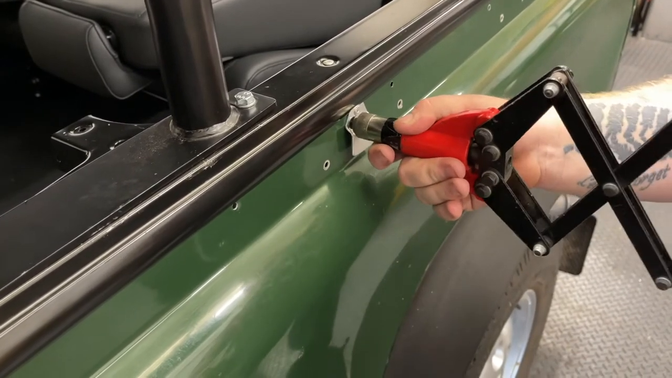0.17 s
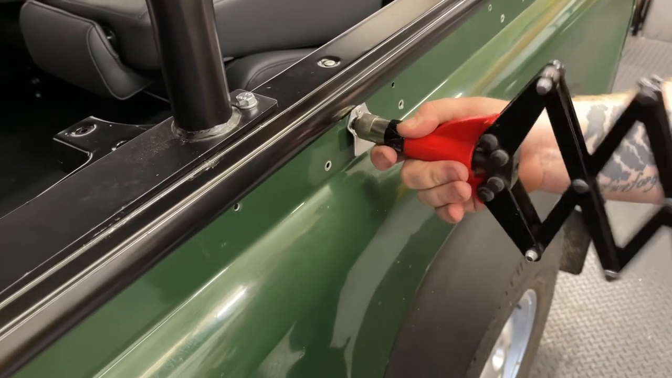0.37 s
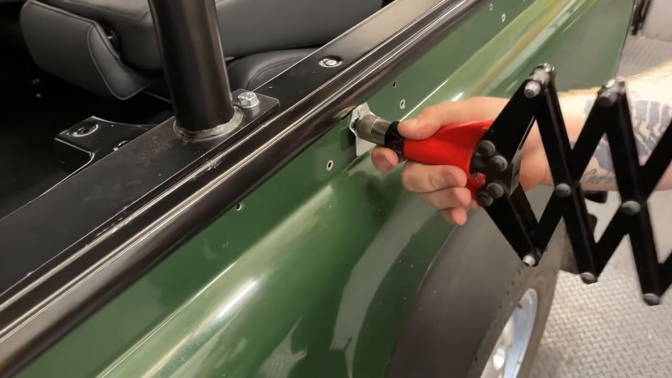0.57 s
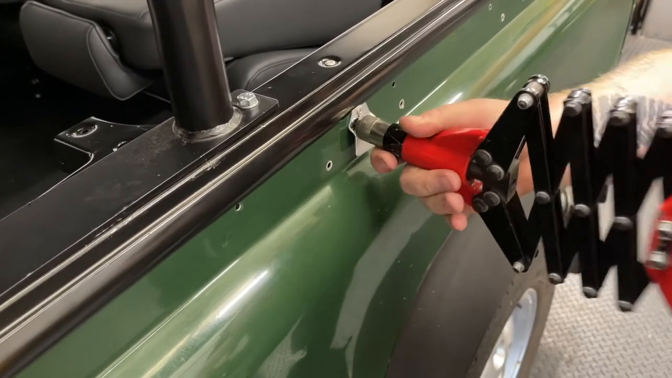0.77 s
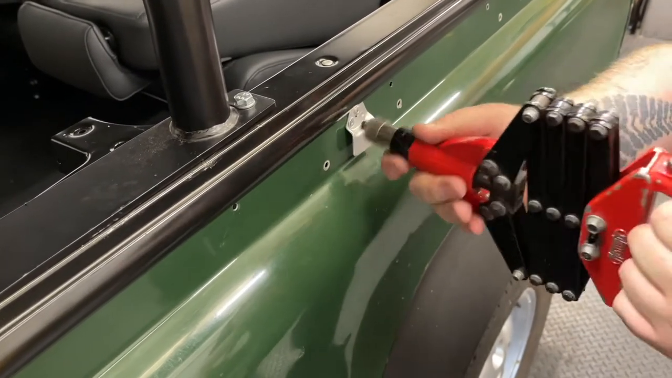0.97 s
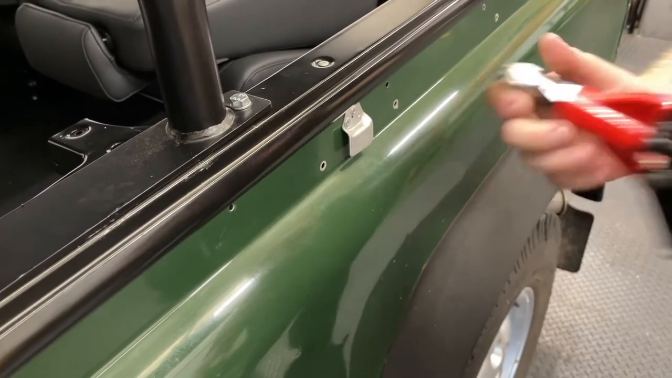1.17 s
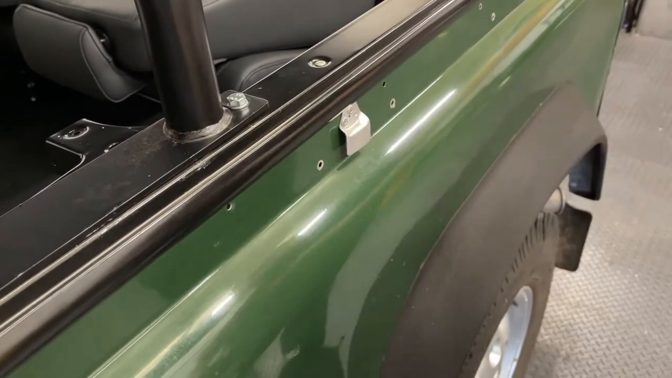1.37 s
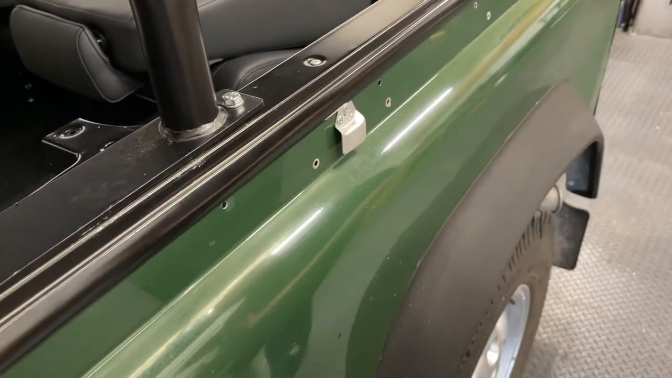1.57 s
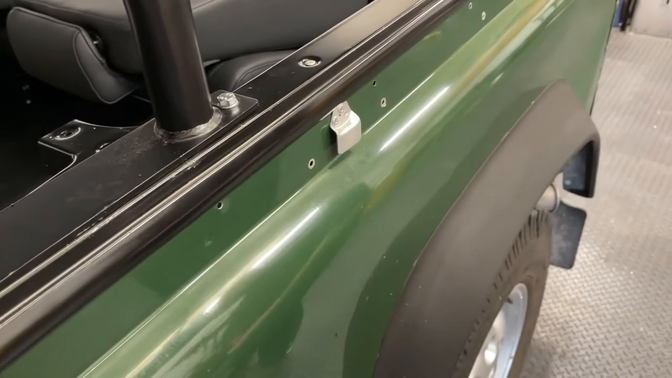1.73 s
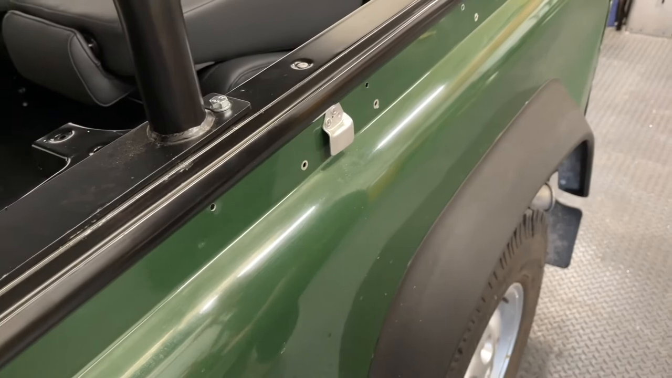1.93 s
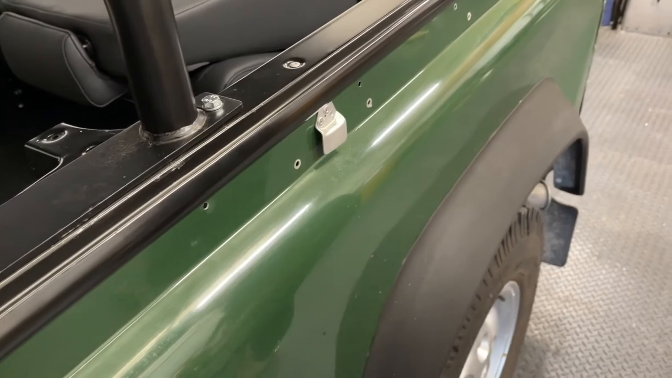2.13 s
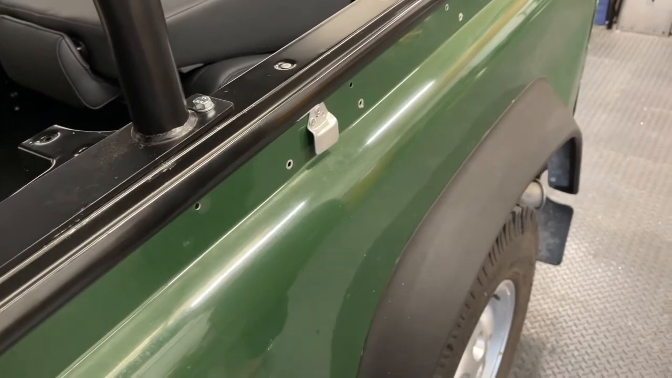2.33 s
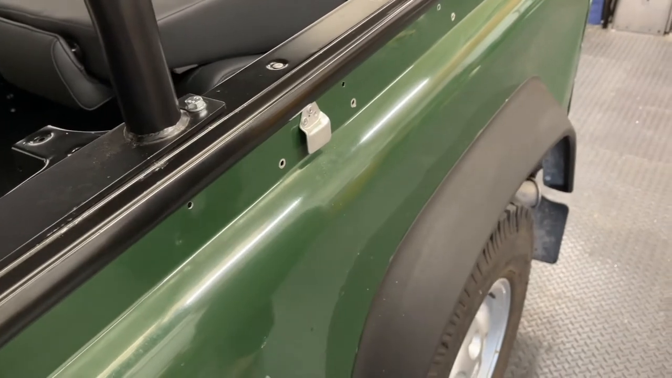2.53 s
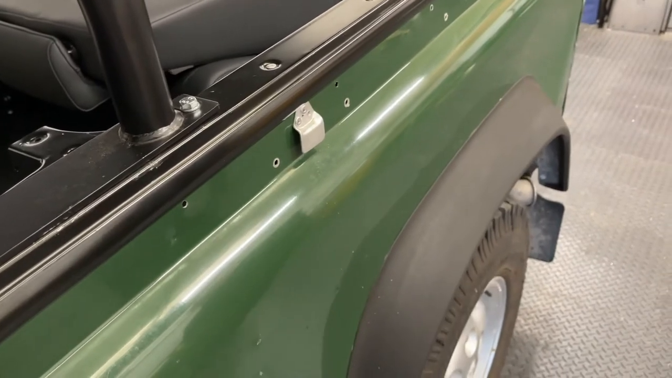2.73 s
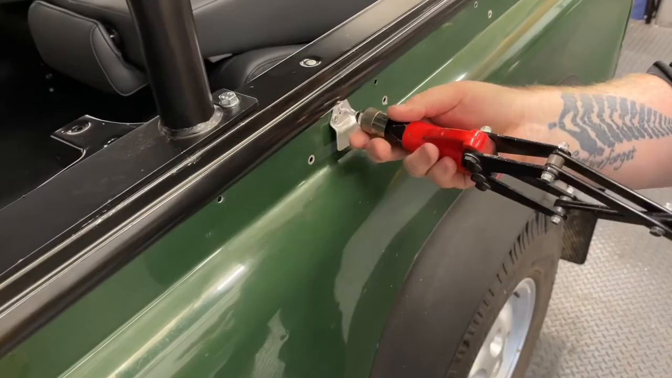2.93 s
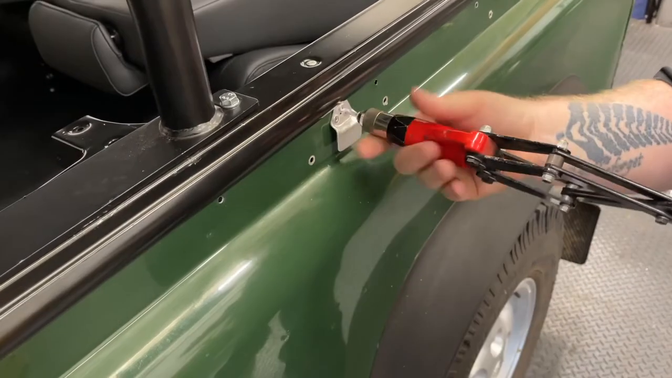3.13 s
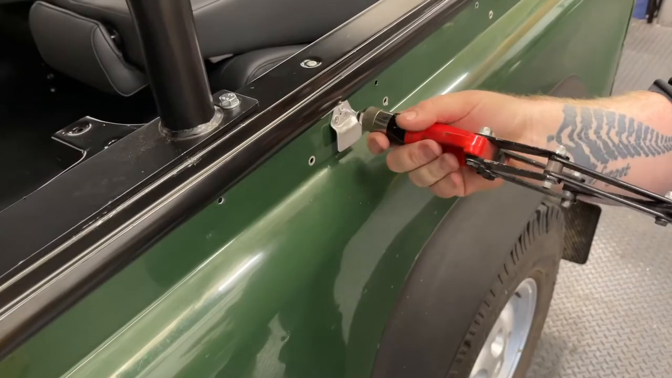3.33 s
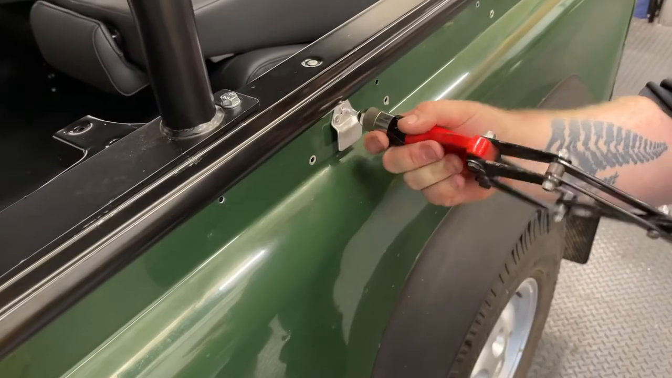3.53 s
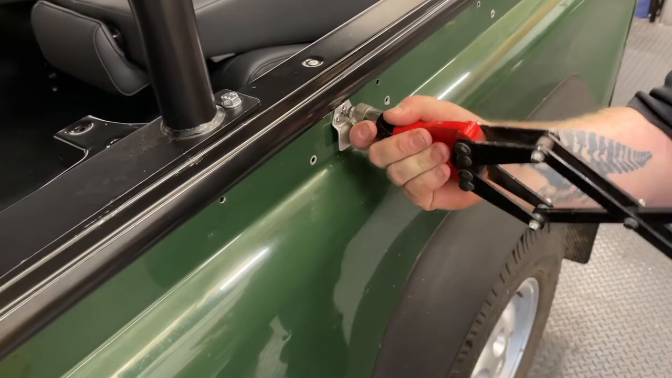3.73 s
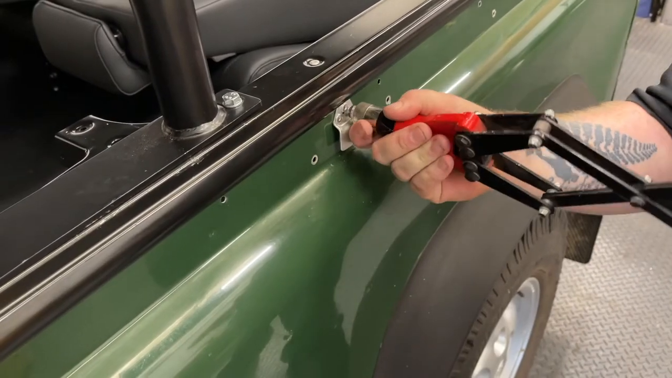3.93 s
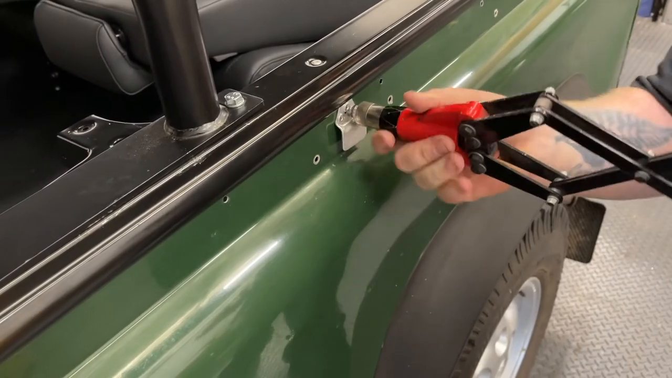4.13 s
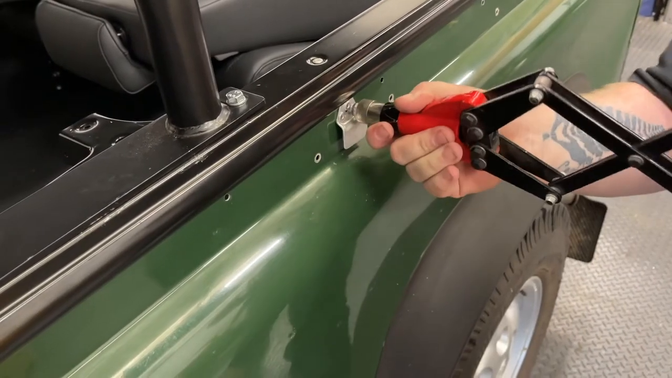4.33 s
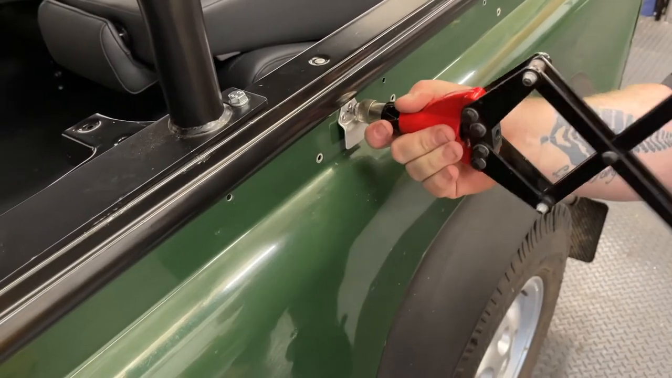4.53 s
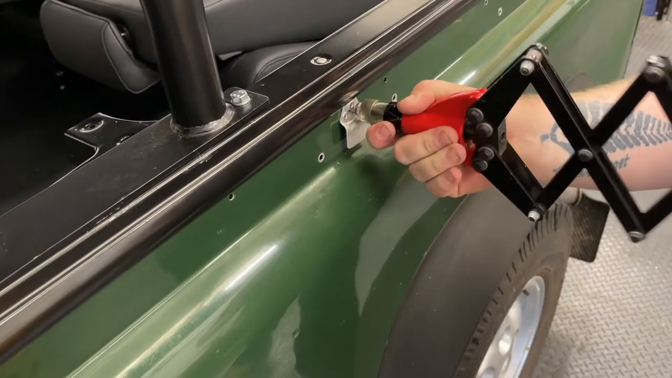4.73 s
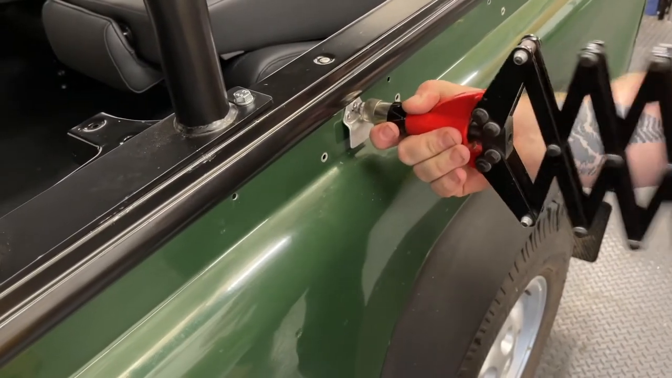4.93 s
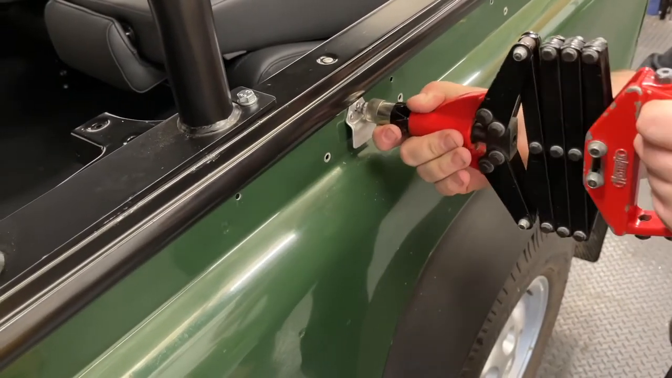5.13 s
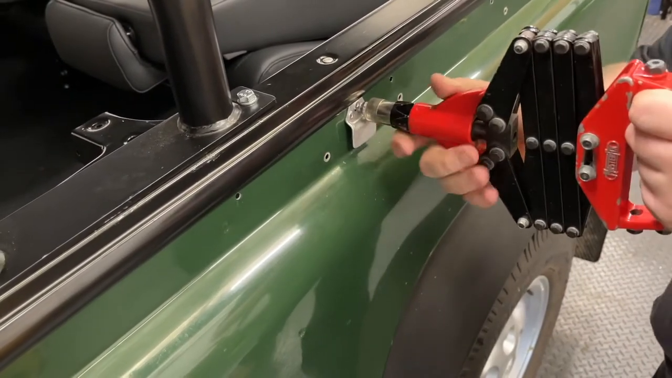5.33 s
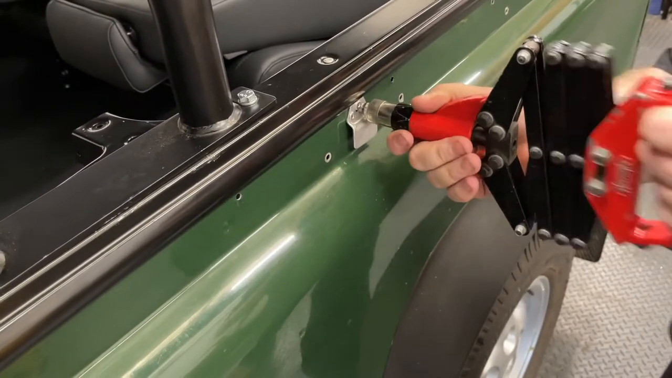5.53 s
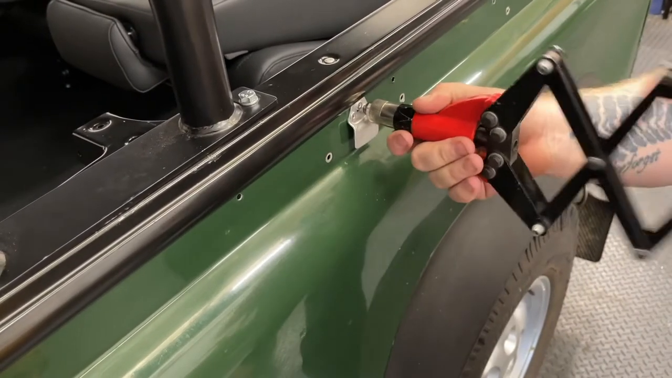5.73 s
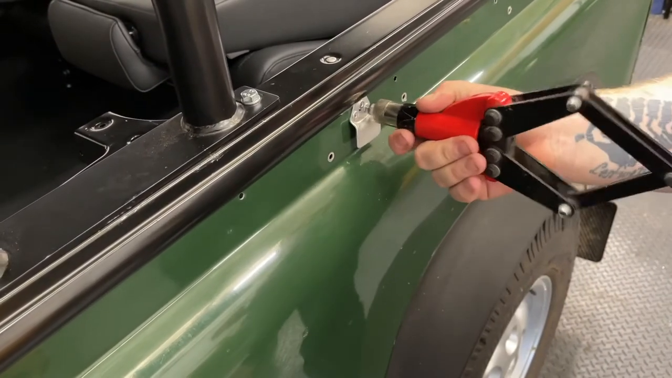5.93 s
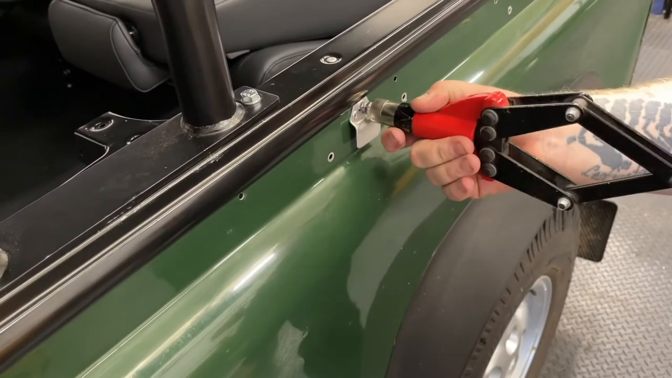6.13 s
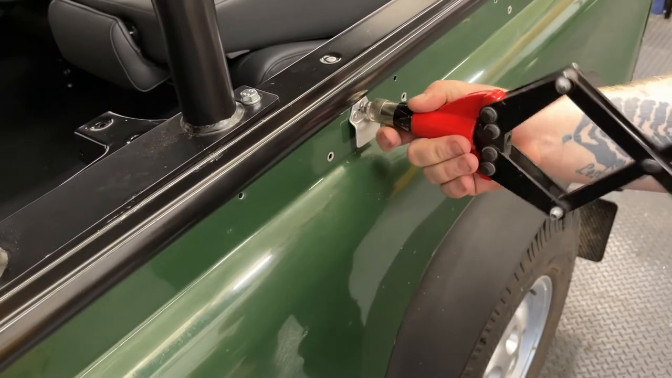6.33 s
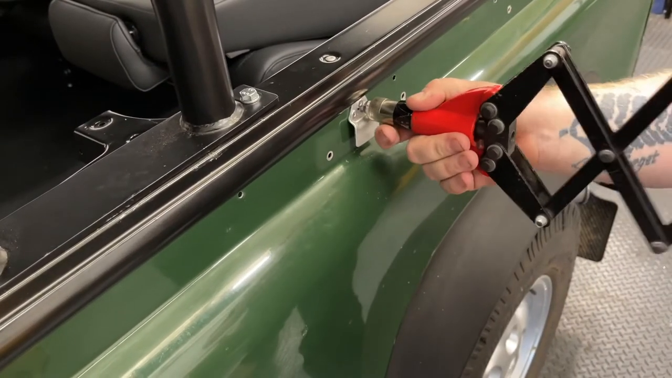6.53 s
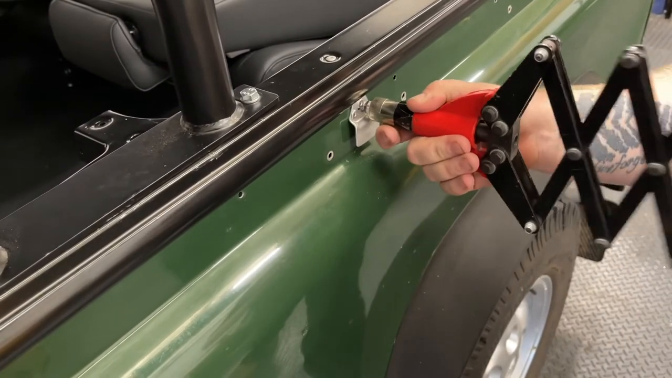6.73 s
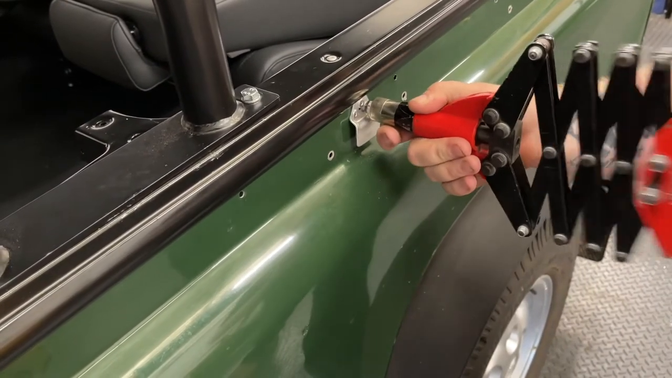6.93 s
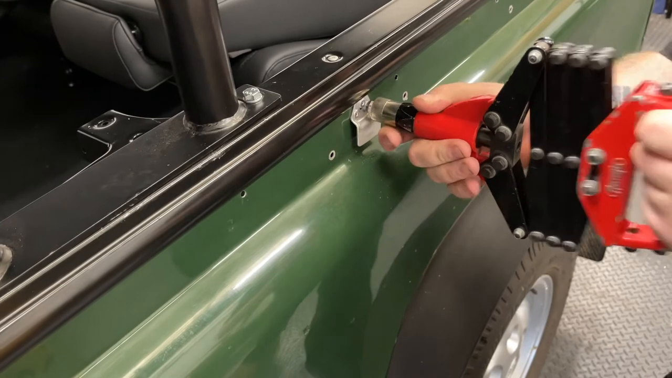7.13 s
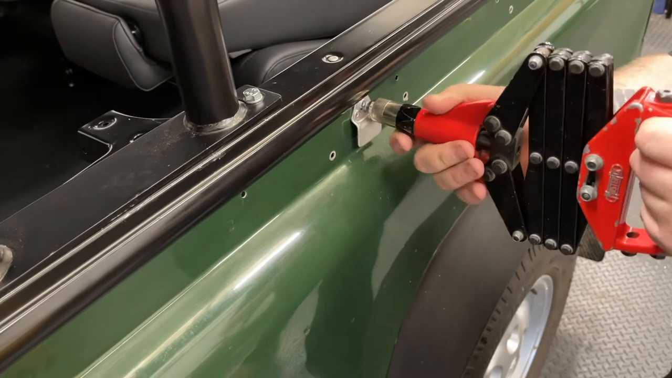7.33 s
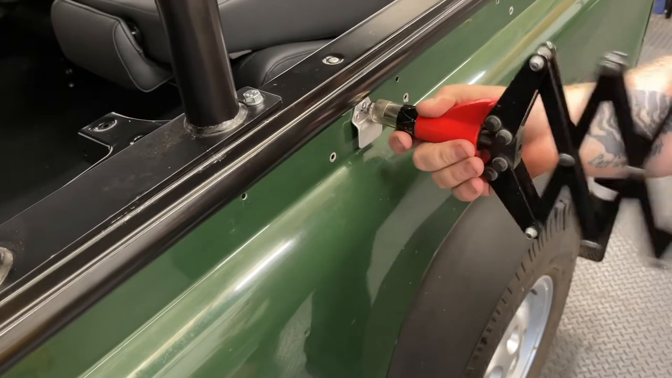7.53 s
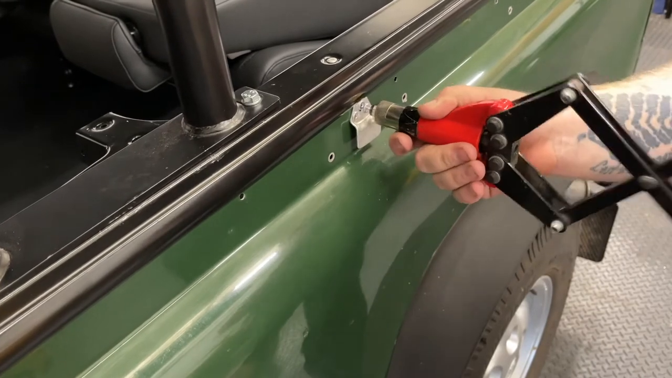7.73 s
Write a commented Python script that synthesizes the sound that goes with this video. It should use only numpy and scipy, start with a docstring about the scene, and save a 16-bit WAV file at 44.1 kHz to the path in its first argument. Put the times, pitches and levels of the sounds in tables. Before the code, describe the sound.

A hand rivet gun with folding steel arms is pumped against a vehicle's side panel, close by and slightly left. At about 0.2 seconds a sharp snap makes the sheet metal clang and the hollow body boom. Light scrapes and a quick cluster of bright clicks follow near 0.85 seconds. From 1.2 to 3.5 seconds it is quieter, with dull knocks, faint ticks and a soft low thud. A hard, clanging snap lands at 3.7 seconds, then more knocks around 4.5. The jaws click on the rivet stem just before each of three further snaps, at about 5.2, 5.9 and 7.1 seconds, each with a thump and brief metallic ring. The links tick and scrape between strokes and on to about 8 seconds, with a dull knock near 7.8. Underneath are a soft hand rustle, low workshop noise and a short echo.

```python
"""First comes a sharp snap with a clang and a boom: a lazy-tongs rivet gun, a tool with folding
steel arms, is being pumped against the side panel of a vehicle in a workshop. Its links tick and
scrape, its jaws bite the rivet stem, and each stroke ends in a snap that makes the sheet metal
clang and the hollow body boom. Dull knocks fall between the strokes. Behind it all are the soft
rustle of a hand, the low noise of the workshop and a short echo."""
import sys
import numpy as np
from scipy import signal
from scipy.fft import rfft, irfft, next_fast_len
from scipy.io import wavfile
from scipy.ndimage import uniform_filter1d

SR = 44100
rng = np.random.default_rng(int(sys.argv[2]) if len(sys.argv) > 2 else 0)


def persist_wave(psi):
    """Save psi, clipped to +-1, as 16-bit WAV."""
    counts = np.round(np.clip(psi, -1, 1) * 32767).astype(np.int16)
    wavfile.write(sys.argv[1], SR, np.atleast_2d(counts).T)


N = 347949


def from_db(db):
    """Turn decibels into a number to multiply a sound by."""
    return 10 ** (np.asarray(db) / 20)


def rms_one(x):
    """Scale a sound so that its average strength (rms) is 1."""
    return x / np.sqrt(np.mean(x ** 2) + 1e-20)


def seconds(length):
    """The time of each sample in a sound of this length."""
    return np.arange(int(length * SR)) / SR


def at_hz(points, hz):
    """Read between the rows of a table, with octaves evenly spaced."""
    knots, values = np.transpose(points)
    return np.interp(np.log(hz + 1), np.log(knots), values)


def add(out, s, sound):
    """Mix a sound in, starting at s seconds."""
    start = int(np.clip(round(s * SR), 0, N - 1))
    out[:, start:start + sound.shape[-1]] += sound[..., :N - start]


def fade(t, t60, rise):
    """Grow quickly, then die away; t60 is the number of seconds it takes to fall by 60 dB."""
    return (1 - np.exp(-t / rise)) * np.exp(-np.log(1000) * t / t60)


def swell(t, peak_s, width_s):
    """A smooth rise and fall around one moment."""
    return np.exp(-((t - peak_s) / width_s) ** 2)


# How alike left and right are, for close and for spread-out sound: f/Hz, likeness/0-1
NEAR = [(100, 0.98), (400, 0.9), (1000, 0.4), (2500, 0.3), (5000, 0.91), (9000, 1)]
FAR = [(80, 0.98), (200, 0.94), (500, 0.32), (1000, 0.029), (9000, .1)]
def noise(colour, likeness, size):
    """Stereo noise of strength 1; its colour says how strong the low and high parts are."""
    n = next_fast_len(size)
    hz = np.fft.rfftfreq(n, 1 / SR)
    mid, side = np.exp(2j * np.pi * rng.random((2, len(hz))))
    alike = np.clip(at_hz(likeness, hz), 0, 1)
    both = np.sqrt(1 + alike) * mid + np.sqrt(1 - alike) * side * [[1], [-1]]
    return rms_one(irfft(both * from_db(at_hz(colour, hz)), n)[:, :size])


def ringing(colour, t60, rise, length=.25):
    """A ring with so many tones that they blur into fading noise."""
    t = seconds(length)
    return noise(colour, NEAR, len(t)) * fade(t, t60, rise)


def tones(table, rise, scatter_db):
    """The separate tones of a struck object, a little different in strength at every hit."""
    t = seconds(.9)
    sound = np.zeros(len(t))
    for k, (hz, db, t60) in enumerate(table):
        strength = (-1) ** k * from_db(db + scatter_db * rng.normal())
        sound += strength * np.sin(2 * np.pi * hz * t) * fade(t, t60, rise)
    return sound


def resonate(x, hz, width):
    """Keep the part of a sound that lies near one frequency."""
    r = np.exp(-np.pi * width / SR)
    feedback = [1, -2 * r * np.cos(2 * np.pi * hz / SR), r * r]
    return signal.lfilter(np.array([1, 0, -1]) * (1 - r * r) / 2, feedback, x)


# Colour of the low rumble: f/Hz, level/dB
RUMBLE_COLOUR = [(20, -34), (40, -11.5), (62, -1), (80, -3), (110, -10), (165, -11), (240, -21),
                 (400, -27.5), (800, -43.5), (3000, -65), (12000, -94.5)]
def rumble(workshop_db=-54.5):
    """The steady low noise of the workshop, and the hollow body rumbling on after each snap."""
    t = seconds(2)
    level = np.full((1, N), from_db(workshop_db))
    for s, _, _, _, _, boom_db, *_ in SNAPS:
        add(level, s, from_db(boom_db - 6.5) * fade(t, t60=1.0, rise=.06))
    return level * noise(RUMBLE_COLOUR, FAR, N)


# Colour of the workshop's echo: f/Hz, level/dB
ECHO_COLOUR = [(60, -3), (200, 3.5), (600, 3.5), (1500, 0), (4000, -5), (9500, -2.5), (10500, -10.5),
               (12000, -14.5), (13000, -41)]
# How long the echo lasts: f/Hz, t60/s
ECHO_FADES = [(100, .6), (500, 0.28), (1500, 0.47), (4000, 0.62), (9000, 0.33), (12000, 0.34)]
def workshop_echo(x):
    """The room throws the sound back; lows, middles and highs each fade at their own speed."""
    t = seconds(1)
    spectrum = rfft(noise(ECHO_COLOUR, FAR, len(t)))
    hz = np.fft.rfftfreq(len(t), 1 / SR)
    centres, t60s = np.transpose(ECHO_FADES)
    echo = np.zeros((2, len(t)))
    for weights, t60 in zip(np.eye(len(centres)), t60s):
        band = irfft(spectrum * at_hz(np.c_[centres, weights], hz), len(t))
        echo += band * fade(t, t60, rise=.0022)
    echo /= np.sqrt(np.sum(echo ** 2) / 2)
    return signal.fftconvolve(x.mean(axis=0)[None], echo, axes=1)[:, :N]


# Slow moves of the hand and tool: loudest t/s, half-width/s, rub/dB, grit/dB
HAND_MOVES = [(1.4, 0.5, -75.5, -66.5), (3.0, 1.0, -65, -72), (4.5, 0.31, -54.5, -62),
              (6.0, 0.58, -51, -63), (7.8, 0.45, -48.5, -60)]
def handling(t):
    """How strong the rub and grit are as the hand moves; a trace is left when it rests."""
    rub = from_db(-81.5) + sum(from_db(db) * swell(t, s, width) for s, width, db, _ in HAND_MOVES)
    grit = from_db(-78) + sum(from_db(db) * swell(t, s, width) for s, width, _, db in HAND_MOVES)
    return rub, grit


# Colours of dull rubbing and of bright, gritty hiss: f/Hz, level/dB
RUB_COLOUR = [(100, -10.5), (250, 1), (450, -3), (720, -1.5), (1200, -9.5), (2200, -13.5), (3500, -25.5),
              (8000, -52.5), (12000, -86)]
GRIT_COLOUR = [(1500, -11), (3000, -3), (5500, -9), (7000, -5.5), (8800, -0.5), (9700, 0), (10400, -24.5),
               (12000, -31), (13500, -62)]
def rustle(uneven_db=2.72):
    """Hand and sleeve move softly and unevenly on the tool."""
    t = np.arange(N) / SR
    rub, grit = handling(t)
    moments = np.arange(0, N / SR, .06)
    touch_db = uneven_db * np.interp(t, moments, rng.standard_normal(len(moments)))
    return from_db(touch_db - 3) * (rub * noise(RUB_COLOUR, FAR, N) + grit * noise(GRIT_COLOUR, FAR, N))


# Deep tones of the vehicle's hollow body: f/Hz, level/dB, t60/s
BODY_TONES = [(51.95, -9.5, 0.34), (74.93, -1, 0.73), (83.6, -5, 0.26), (142.7, -11.5, 0.65),
              (169, -6.5, 0.51), (183.8, -13.5, 0.77), (226.6, -16.5, 0.56), (294, -15.5, 0.21)]
# Soft shoves on the body: t/s, level/dB
SHOVES = [(1.862, -49.5), (2.892, -25.5), (4.461, -37.5), (3.22, -32.5), (5.091, -23.5), (5.735, -34),
          (5.855, -24), (6.36, -27), (6.995, -21.5), (7.546, -35)]
def shoves(out, softer_db_per_octave=4):
    """Leaning on the tool rocks the body, mostly its low tones; a faint boom also goes with each knock."""
    main_hz = BODY_TONES[1][0]
    softened = [(hz, db - softer_db_per_octave * np.log2(hz / main_hz), t60)
                for hz, db, t60 in BODY_TONES]
    with_knocks = [(s, db - 18.5) for s, db, _ in KNOCKS]
    for s, boom_db in SHOVES + with_knocks:
        add(out, s, from_db(boom_db + 2.5) * tones(softened, rise=.011, scatter_db=2.56))


# Colour of a clang, and of the knocks' noisy ring: f/Hz, level/dB
CLANG_COLOUR = [(120, -17), (250, 1), (370, 1.5), (520, -4), (700, 0.5), (1000, -6.5), (1450, -5),
                (2000, -16.5), (3500, -25), (7000, -51.5), (12000, -84.5)]
# Dull knocks, each sliding down through its pitch f: t/s, level/dB, f/Hz
KNOCKS = [(1.225, -45, 334), (1.663, -28.5, 293), (1.741, -30.5, 318), (2.184, -37.5, 293),
          (2.209, -36, 380), (2.386, -37.5, 303), (2.526, -45, 298), (2.741, -44, 573), (4.284, -30, 313.5),
          (4.372, -34, 261.6), (4.4, -33, 320), (4.653, -36.5, 354), (4.701, -25.5, 439.4),
          (7.756, -19, 195.4)]
def knocks(out):
    """Dull knocks, each falling quickly in pitch, with a brief noisy ring."""
    t = seconds(.05)
    for s, db, hz in KNOCKS:
        pitch = hz * (.694 + 1.775 * np.exp(-t / .0028))
        loudness = swell(t, peak_s=.0053, width_s=.004) * (1 - np.exp(-t / .00059))
        add(out, s, from_db(db + 2.5) * loudness * np.sin(2 * np.pi * np.cumsum(pitch) / SR))
        add(out, s, from_db(db - 14.5) * ringing(CLANG_COLOUR, t60=.13, rise=.0012))


# Colour of the ringing steel links: f/Hz, level/dB
LINK_COLOUR = [(900, -25), (1500, -3.5), (2140, 2), (2350, 1.5), (2670, -2), (3000, -3), (3450, -2.5),
               (3900, -4.5), (4600, -8.5), (5600, -7), (6350, -6.5), (7000, -10), (10000, -25),
               (12000, -59)]
# Scrapes of the links: loudest t/s, build-up/s, run-out/s, rub/dB, steel compared with rub/dB
SCRAPES = [(.527, 0.0068, 0.063, -42, -24), (.826, .075, 0.018, -44, -17), (1.67, 0.029, .15, -54, -3.5),
           (1.89, .03, .04, -62, 0.5), (2.222, .02, .06, -59.5, 0), (2.77, .02, .11, -65.5, 1.5),
           (2.908, 0.016, .16, -49, -29), (3.216, .032, .035, -45.5, -29), (3.325, 0.0042, 0.025, -53, -5),
           (3.58, .015, .04, -55, -12), (3.662, 0.029, 0.014, -29, -18), (4.29, .015, .07, -46, -4.5),
           (5.745, .014, 0.088, -46, -11), (5.93, .08, .02, -25, -11), (6.215, .011, 0.12, -40, -13),
           (6.345, 0.028, 0.054, -32.5, -14), (7.545, .08, .11, -42.5, -27),
           (7.742, 0.0098, .08, -32.5, -15.5), (7.885, .13, 0.049, -27.5, -23.5)]
def scrapes(out, slips_per_s=280, slip_s=.0026, smooth=.84):
    """The joints rub in many tiny slips, dull through the panel, bright and gritty from the steel."""
    for s, build_up, run_out, rub_db, steel_db in SCRAPES:
        t = seconds(build_up + run_out)
        n = len(t)
        kicks = (rng.random(n) < slips_per_s / SR) * rng.exponential(1, n)
        slips = signal.lfilter([1], [1, -np.exp(-1 / (slip_s * SR))], kicks + 1e-18)
        friction = rms_one(smooth + rms_one(slips))
        pressure = from_db(rub_db) * np.interp(t, [0, build_up, build_up + run_out], [0, 1, 0])
        steel = noise(LINK_COLOUR, NEAR, n) + from_db(-.5) * noise(GRIT_COLOUR, NEAR, n)
        rub = noise(RUB_COLOUR, NEAR, n)
        add(out, s - build_up, pressure * friction * (rub + from_db(steel_db) * steel))


# Where the steel jaws ring most strongly: f/Hz, width/Hz, level/dB
JAW_BANDS = [(4370, 1500, -12), (6200, 1600, -14.5), (8100, 1400, -11), (8780, 1300, 2.5),
             (11600, 340, -12)]
def jaw_crack():
    """The first instant of steel hitting steel, scaled to a peak of 1."""
    impulse = signal.unit_impulse(len(seconds(.01)))
    click = signal.sosfilt(signal.butter(4, 12000, fs=SR, output="sos"), impulse)
    crack = sum(from_db(db + 1.5 * rng.normal()) * resonate(click, hz, width)
                for hz, width, db in JAW_BANDS)
    return crack / np.abs(crack).max()


def faint_ticks(chances_per_s=5, scatter_db=3):
    """Loose joints tick at random while the tool moves, louder as it moves more; rows as in TICKS."""
    when, chance = rng.random((int(chances_per_s * N / SR), 2)).T
    s = when * N / SR
    moving = sum(swell(s, peak_s, width_s) for peak_s, width_s, _, _ in HAND_MOVES)
    rub_db, grit_db = 20 * np.log10(handling(s)) + scatter_db * rng.standard_normal((len(s), 2)).T
    return np.c_[s, grit_db + 17.5, rub_db + 2.5][chance < moving]


# Colour of the jaws' bright ring: f/Hz, level/dB
JAW_COLOUR = [(5000, -24), (7000, -9.5), (8000, -5.5), (8900, -1.5), (9800, -4), (11500, -2.5),
              (12500, -21), (13800, -40.5), (15600, -36), (17000, -49.5)]
# Clear ticks of the links: t/s, steel/dB, panel/dB
TICKS = [(0.522, -57, -31), (0.8377, -13.5, -53), (0.8436, -17, -56), (0.8596, -7, -43.5),
         (1.0958, -38.5, -69), (1.214, -38.5, -88), (1.349, -43.5, -55), (1.435, -34.5, -53),
         (1.6634, -42.5, -40.5), (2.09, -48.5, -75), (3.0313, -38, -43), (3.2124, -35, -39.5),
         (3.6845, -18, -10), (4.1789, -40, -52.5), (4.2832, -36.5, -40.5), (5.408, -51, -47),
         (5.6209, -36, -36), (5.676, -40, -38.5), (5.7321, -28.5, -35), (5.76, -27, -41), (5.826, -31, -50),
         (5.85, -30.5, -28.5), (6.211, -56, -37), (6.2354, -28.5, -45.5), (6.4174, -40, -41.5),
         (7.4272, -44.5, -46), (7.497, -44, -32.5), (7.5419, -48, -30.5), (7.5835, -37, -38),
         (7.7342, -31, -26.5), (7.8194, -33.5, -27), (7.8834, -28, -20)]
def ticks(out, steel_share=.7):
    """Slack joints close with small clicks that pass through the links into the panel."""
    for s, steel_db, panel_db in [*TICKS, *faint_ticks()]:
        link_db = steel_share * steel_db + (1 - steel_share) * panel_db - 6.5
        add(out, s, from_db(steel_db + 6) * jaw_crack())
        add(out, s, from_db(steel_db - 6) * ringing(JAW_COLOUR, t60=.033, rise=.00012))
        add(out, s, from_db(link_db) * ringing(LINK_COLOUR, t60=.036, rise=.00036))
        add(out, s, from_db(panel_db) * ringing(CLANG_COLOUR, t60=.087, rise=.003))


# Thin tones of the loose links: f/Hz, level/dB, t60/s
LINK_TONES = [(2153, -8.5, .14), (2750, -4, .12), (4350, -4, .1), (4700, 1, 0.11), (5070, -3.5, .15),
              (7639, -6.5, .15), (9060, -0.5, .12), (9210, -4.5, .15)]
def link_ring(out):
    """After a clear tick the steel bars go on ringing thinly."""
    for s, steel_db, _ in TICKS:
        add(out, s, from_db(steel_db - 30.5) * tones(LINK_TONES, rise=.00093, scatter_db=3))


# The jaws biting the rivet stem: t/s, jaw/dB, stem/dB, stem f/Hz
BITES = [(5.0608, -18, -23.5, 828), (5.099, -17, -20, 636), (5.867, -42, -24.5, 710),
         (5.9056, -45, -21, 628), (5.9156, -28, -20.5, 629), (6.336, -31.5, -29.5, 722.5),
         (6.9698, -19.5, -23, 840), (7.0132, -18.5, -21, 631)]
def bites(out):
    """The jaws slip and catch on the stem, which rings briefly against the sheet; the links jolt."""
    t = seconds(.25)
    thump = np.sin(2 * np.pi * 180 * t) * fade(t, t60=.048, rise=.0041)
    for s, jaw_db, stem_db, stem_hz in BITES:
        add(out, s, from_db(jaw_db + 11) * jaw_crack())
        add(out, s, from_db(jaw_db - 7.5) * ringing(JAW_COLOUR, t60=.05, rise=.00028))
        add(out, s, from_db(-37.5) * ringing(LINK_COLOUR, t60=.074, rise=.00047))
        add(out, s, from_db(stem_db - 5.5) * ringing(CLANG_COLOUR, t60=.15, rise=.0065))
        stem = [(stem_hz * .86, -4, .11), (stem_hz, 0, .09), (stem_hz * 1.19, -5, .08)]
        add(out, s, from_db(stem_db + 3) * tones(stem, rise=.003, scatter_db=1.5))
        add(out, s + .008, from_db(stem_db + 7) * thump)


# Tones of the side panel, and of the folded tongs ringing as one block: f/Hz, level/dB, t60/s
PANEL_TONES = [(367.5, -7, 0.23), (440.5, -14.5, 0.32), (625, -5, 0.36), (880, -9, 0.56), (1410, -9, 0.6),
               (1560, -13.5, 0.19), (1684, -8, 0.17), (2010, -10, .33), (2165, -9.5, 0.49),
               (2385, -12.5, 0.29), (2420, -14.5, 0.26), (2630, -15, 0.24)]
TONGS_TONES = [(846, -1, 0.18), (923, -7.5, 0.32), (956, 5, 0.15), (1080, -5, 0.085), (1153, -6.5, 0.25),
               (1185, -5.5, 0.23), (1310, -10.5, .25)]
# Colours of the tongs' loose rattle and of the sheet ringing on: f/Hz, level/dB
RATTLE_COLOUR = [(400, -26.5), (750, -9.5), (1000, 3), (1300, -5.5), (1550, -15.5), (1900, -27),
                 (6000, -58.5)]
AFTER_RING_COLOUR = [(150, -12), (330, -3.5), (600, 0), (1000, 0.5), (1700, 9.5), (2600, 1), (3900, -6),
                     (5500, -12.5), (7200, -13.5), (8400, -6.5), (9700, -11.5), (10300, -54),
                     (16000, -91.5)]
# Hard snaps: t/s, jaw/dB, link/dB, clang/dB, thump/dB, boom/dB, tongs/dB, after-ring/dB, hiss/dB
SNAPS = [(0.2344, -16, -26.5, -23.5, -22.5, -24, -62, -35.5, -39.5),
         (3.668, -22, -15.5, -15, -17.5, -18.5, -32, -33, -60),
         (5.1981, -20, -29, -20.5, -18, -23.5, -25, -59, -65),
         (5.946, -19, -17, -17, -20, -26, -35, -40.5, -62.5),
         (7.1286, -19, -25, -22, -15.5, -24, -30.5, -56, -73)]
def snaps(out, rebound_s=.016):
    """The stroke lets go: steel cracks, the sheet clangs, the body booms and the tongs ring."""
    t, tail = seconds(.25), seconds(1)
    thump = np.sin(2 * np.pi * 168 * t) * fade(t, t60=.064, rise=.0032)
    for s, jaw_db, link_db, clang_db, thump_db, boom_db, tongs_db, ring_db, hiss_db in SNAPS:
        add(out, s, from_db(jaw_db + 18) * jaw_crack())
        add(out, s + rebound_s, from_db(jaw_db + 2) * jaw_crack())  # the jaws hit again, more softly
        add(out, s, from_db(jaw_db + .5) * ringing(JAW_COLOUR, t60=.054, rise=.0004))
        add(out, s, from_db(link_db + 2.5) * ringing(LINK_COLOUR, t60=.072, rise=.00027))
        add(out, s, from_db(clang_db + 6) * ringing(CLANG_COLOUR, t60=.1, rise=.0013))
        add(out, s, from_db(ring_db + 3.5) * tones(PANEL_TONES, rise=.003, scatter_db=1))
        add(out, s, from_db(tongs_db + .5) * tones(TONGS_TONES, rise=.0035, scatter_db=1.5))
        add(out, s, from_db(tongs_db - 3) * ringing(RATTLE_COLOUR, t60=.29, rise=.003, length=.5))
        add(out, s + .0025, from_db(thump_db + 11.5) * thump)
        add(out, s + .012, from_db(boom_db + 3) * tones(BODY_TONES, rise=.027, scatter_db=1.5))
        after_ring = noise(AFTER_RING_COLOUR, FAR, len(tail)) * fade(tail, t60=.79, rise=.0037)
        add(out, s, from_db(ring_db - 1) * after_ring)
        hiss = noise(GRIT_COLOUR, FAR, len(tail)) * swell(tail, peak_s=.076, width_s=.19)
        add(out, s, from_db(hiss_db - 4.5) * hiss)  # a bright hiss hangs briefly after the snap


# How much louder the tool is on the left: f/Hz, left minus right/dB
LEFT_BALANCE = [(70, 1), (170, -4), (330, -0.5), (650, 2.5), (1500, 0), (5000, 3.5), (9000, 0.5)]
def from_the_left(x, lead_samples=1.22):
    """The left microphone hears the tool slightly sooner and, at most pitches, louder."""
    n = next_fast_len(N)
    hz = np.fft.rfftfreq(n, 1 / SR)
    lean = from_db(at_hz(LEFT_BALANCE, hz) / 2) * np.exp(1j * np.pi * hz / SR * lead_samples)
    return irfft(rfft(x, n) * np.array([lean, 1 / lean]), n)[:, :N]


def scene():
    """Tool, panel and knocks close by, the workshop around them."""
    close = np.zeros((2, N))
    for source in (snaps, bites, knocks, shoves, scrapes, ticks, link_ring):
        source(close)
    return from_the_left(close + rustle()) + from_db(-16) * workshop_echo(close) + rumble()


def record(dry):
    """The microphone dulls a thin band of treble; the level dips once; peaks and top highs are tamed."""
    t = np.arange(N) / SR
    dip_start_s, dip_end_s = 2.853, 2.893
    outside_dip = uniform_filter1d(1. * ((t < dip_start_s) | (t > dip_end_s)), size=200)
    notched = dry - .85 * resonate(dry, hz=10200, width=350)
    dipped = notched * np.maximum(outside_dip, from_db(-33))
    rounded = .99 * np.tanh(dipped / .96)
    return signal.sosfiltfilt(signal.butter(14, 16600, "lowpass", fs=SR, output="sos"), rounded)


dry = scene()
out = record(dry)
persist_wave(out)
```